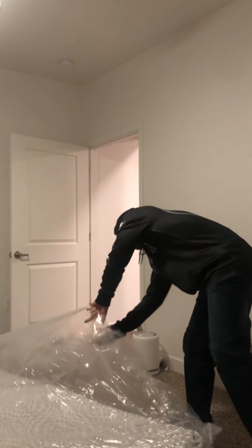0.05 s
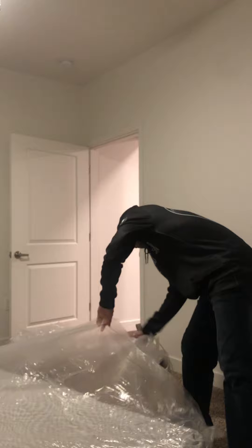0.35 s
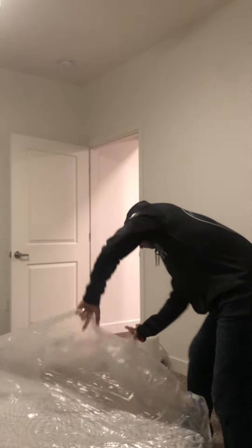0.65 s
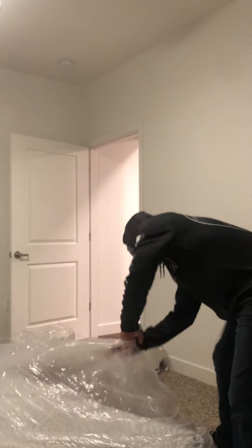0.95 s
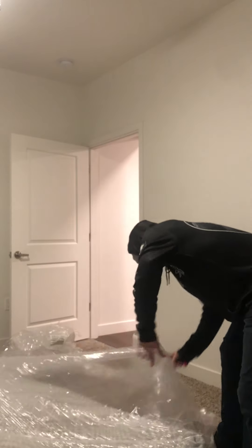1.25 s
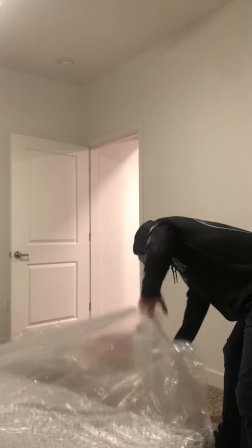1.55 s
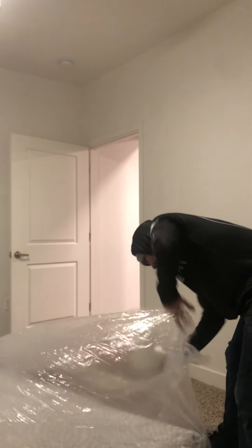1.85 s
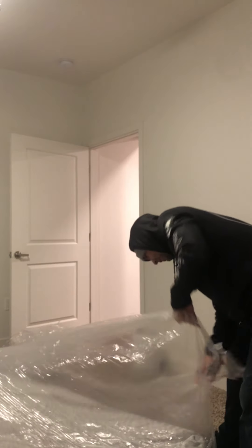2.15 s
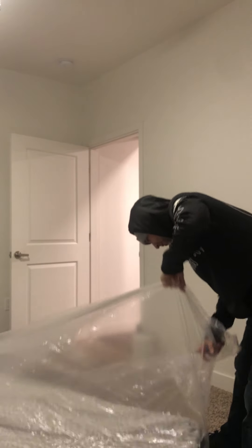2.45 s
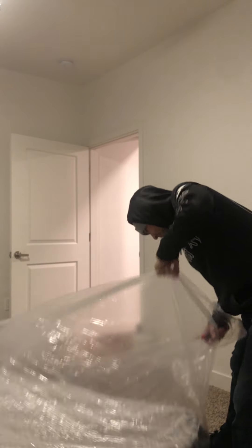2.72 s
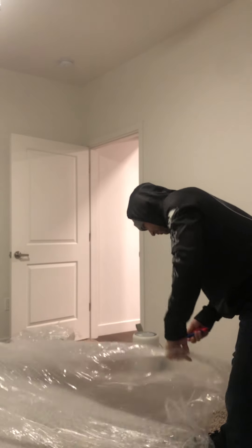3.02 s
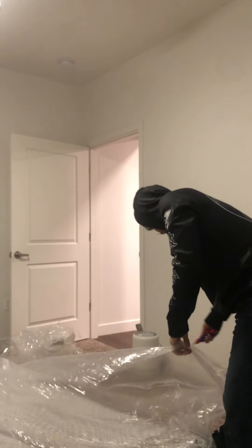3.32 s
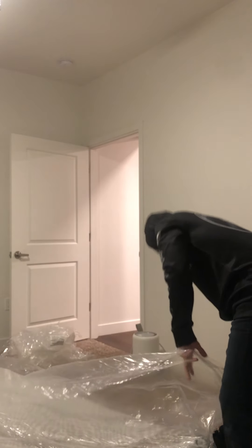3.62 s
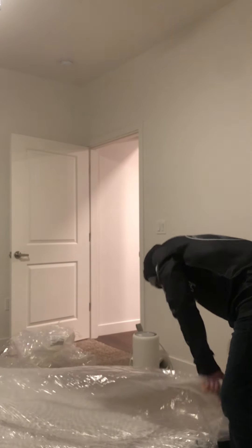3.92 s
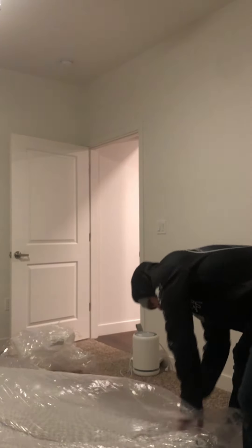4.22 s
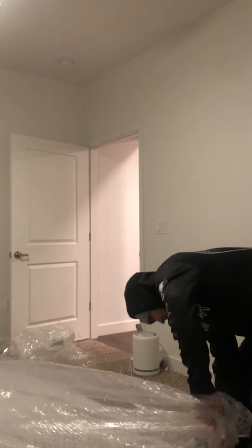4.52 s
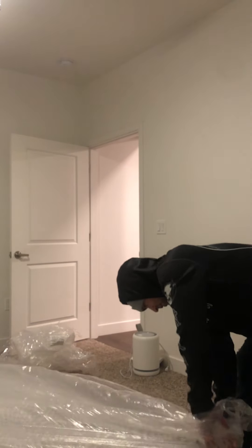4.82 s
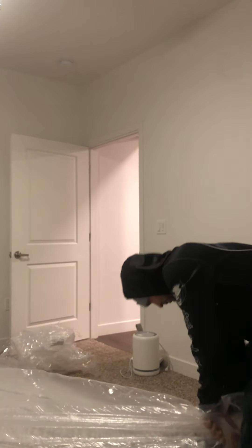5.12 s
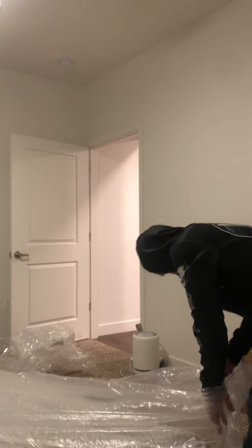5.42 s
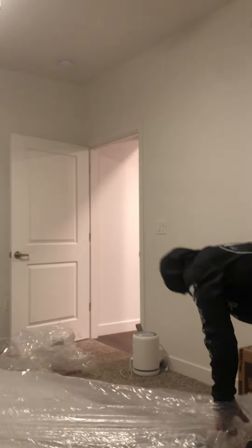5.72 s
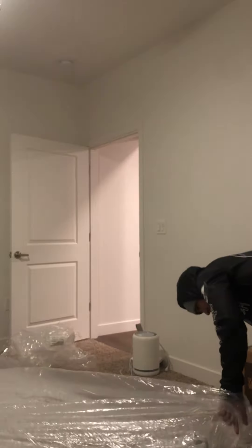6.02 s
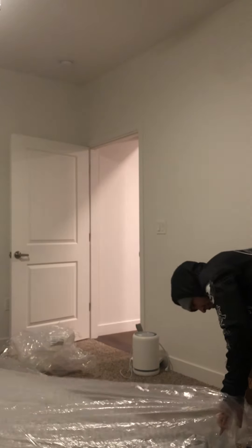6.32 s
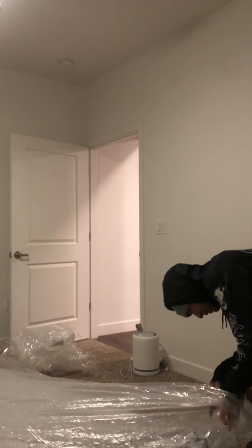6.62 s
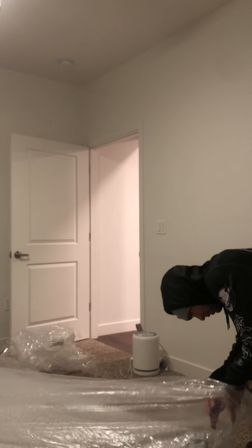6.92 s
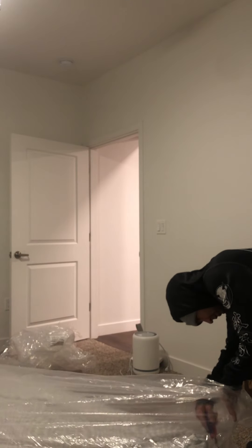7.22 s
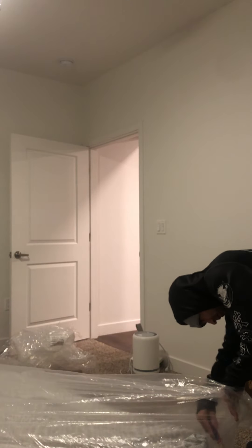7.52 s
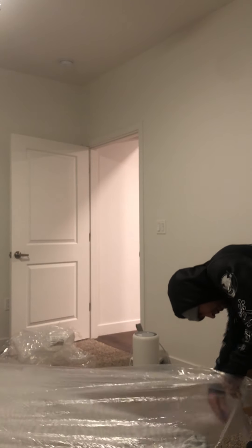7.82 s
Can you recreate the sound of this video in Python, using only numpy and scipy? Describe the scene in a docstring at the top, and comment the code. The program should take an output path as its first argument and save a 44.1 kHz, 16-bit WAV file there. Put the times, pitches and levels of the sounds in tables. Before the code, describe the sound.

Thick plastic wrap rustles and crinkles throughout as it is pulled off a mattress in a quiet, bare bedroom. For the first three seconds the tugs come quickly and are at their fullest, with a soft low billowing underneath and bright crease ticks, the sharpest just before 2 seconds. The rustle eases, and a short chirpy squeak comes at about 3.3 seconds, followed by a thin ping. At 3.9 seconds a cutter drops onto the carpeted floor with a loud, deep thump and bounces for about half a second, its steel blade ringing faintly. The crinkling resumes, with two light taps on hollow plastic around 4.8 and 5 seconds. A foot comes down dully at about 6 seconds. The sheet then slithers more quietly with scattered ticks, until the taut plastic snaps and rips several times between 7.4 and 7.9 seconds.

```python
"""Thick plastic wrap is cut and pulled off a mattress in a bare, carpeted bedroom.
The sheet slides, billows and buckles in countless tiny creases; single creases tick as they flip,
and taut film snaps and rips. Midway the film or the sliding cutter gives a short, chirpy squeak;
then the cutter drops to the floor with a thump and bounces, its steel blade ringing.
Hollow plastic is tapped twice, and later a foot comes down."""
import sys
import numpy as np
from scipy import signal
from scipy.fft import rfft, irfft, next_fast_len
from scipy.io import wavfile
from scipy.ndimage import uniform_filter1d

SR = 44100
rng = np.random.default_rng(int(sys.argv[2]) if len(sys.argv) > 2 else 0)


def to_wav(sig):
    """Store sig (one row per channel, or 1-D mono) as 16-bit WAV at the path in sys.argv[1].

    Samples outside -1..1 are clipped; the rate is SR.
    """
    pcm = np.clip(np.atleast_2d(sig), -1, 1) * 32767
    pcm = np.round(pcm).astype(np.int16)
    wavfile.write(sys.argv[1], SR, pcm.T)  # frames by channels


N = 355446
TIME = np.arange(N) / SR

# Tone colours of the quiet room, the slack sheet, the brighter taut film and crushed carpet.
# Each row: frequency in Hz, relative spectral level in dB.
ROOM_TONE_EQ = [(25, -14), (45, -20), (120, -27), (400, 5), (2000, 1), (8000, -14), (16000, -26)]
SHEET_EQ = [(21, -48), (35, -12), (140, 2.5), (360, 2.5), (420, 1.5), (478, 1.5), (758, -4), (1110, -4.5),
            (1680, -2), (2170, -5.5), (2530, -4), (7420, -8), (11200, -12), (14400, -17.5), (16000, -23)]
TAUT_FILM_EQ = [(100, -5), (300, 2), (600, 2.5), (1200, 6), (2500, 1.5), (6000, -0.5), (11000, -4),
                (14000, -5.5), (16000, -18)]
CARPET_EQ = [(35, -37), (80, -12), (170, 5.5), (330, 1), (560, 2), (900, -15), (2000, -32), (8000, -50)]
# The bedroom's reverb. Each row: frequency in Hz, t60 in seconds.
ROOM_DECAY = [(100, 0.79), (500, 0.25), (1500, 0.4), (4000, 0.28), (9000, 0.31), (15000, 0.2)]
# The sheet keeps slithering under the hands between pulls. Each row: time in seconds, level in dB.
SLITHER_LEVEL = [(0, -45), (0.3, -41.5), (1.59, -36.5), (2.02, -41.5), (2.54, -40), (2.77, -44.5),
                 (3.45, -48.5), (3.74, -51), (4.37, -39), (5.19, -47), (5.69, -43.5), (6.49, -50),
                 (6.79, -56), (7.17, -50), (7.28, -57), (7.45, -49.5), (7.72, -48), (8.0, -44.5)]
# Pulls and shoves of the sheet. Each row: start in seconds, length in seconds, rustle in dB,
# then sizzle of tight creases and flapping of large folds, both in dB relative to the rustle.
SHEET_PULLS = [(0.08, 0.11, -36.5, -7, -6.5), (0.306, 0.082, -34.5, -4, -2), (0.376, 0.13, -32, -5, -1.5),
               (0.656, 0.069, -42.5, 2, -4), (0.822, 0.18, -40, -4.5, -6.5), (1.031, 0.2, -37, -6.5, -7),
               (1.28, 0.11, -36.5, -2, -8), (1.591, 0.14, -32, -3.5, -3), (1.724, 0.21, -39, -5, -1.5),
               (2.03, 0.066, -43.5, 0.5, -7), (2.149, 0.18, -35, -3.5, -6),
               (2.555, 0.094, -37.5, -10, -4.5), (2.803, 0.27, -41, -7.5, -3.5),
               (3.266, 0.046, -47, -15, -7), (3.542, 0.06, -48, -13, -3.5), (3.805, 0.1, -46.5, -5, -4),
               (4.238, 0.24, -38.5, -4, -12), (4.434, 0.115, -35.5, -6.5, -5.5),
               (4.734, 0.095, -43, -7, -3), (4.96, 0.12, -44, -3, -2), (5.224, 0.072, -42.5, 1, -4),
               (5.324, 0.054, -35, -6, 0), (5.498, 0.075, -43.5, -0.5, 0.5),
               (5.746, 0.095, -45.5, -0.5, -12), (5.977, 0.045, -42, -5.5, -10),
               (6.138, 0.032, -40.5, 0.5, -18), (6.3, 0.16, -47, -9.5, -4.5),
               (6.545, 0.13, -50.5, -13, -4.5), (6.914, 0.1, -40.5, -3.5, -4.5),
               (7.314, 0.052, -40, -8, -3), (7.384, 0.033, -40.5, -6, 3.5), (7.766, 0.13, -38.5, -8, -4)]
# Film jerked taut, snapping or ripping.
# Each row: start in seconds, level in dB, t60 in seconds, boom send in dB.
FILM_SNAPS = [(0.353, -26.5, 0.078, -10), (3.7637, -38, .012, -12), (3.896, -35.5, 0.12, 0),
              (3.912, -33, 0.19, -13), (4.04, -29, 0.1, -1), (4.106, -32, 0.05, -14),
              (4.129, -35, 0.046, -14), (4.766, -35, 0.12, -15), (5.015, -33.5, 0.028, 8.5),
              (6.161, -33, 0.089, -0.5), (7.275, -38.5, 0.012, -12), (7.421, -28.5, 0.038, -10),
              (7.556, -21, 0.018, -0.5), (7.596, -26, 0.028, 6.5), (7.604, -31.5, 0.11, -5),
              (7.766, -32.5, 0.13, 0), (7.7798, -20, 0.036, -5), (7.797, -31, 0.23, -4.5)]
# Loud single creases flipping over. Each row: start in seconds, level in dB.
CREASE_TICKS = [(0.653, -19), (0.986, -16), (1.828, -11), (1.906, -13), (3.315, -22.5), (3.49, -28),
                (3.587, -23.5), (3.652, -28), (3.764, -25), (3.858, -33), (4.703, -19), (5.013, -21),
                (5.029, -21), (5.116, -24), (5.1836, -21), (6.302, -31), (6.478, -28), (6.827, -34),
                (6.877, -31), (7.001, -19), (7.201, -25.5), (7.275, -41), (7.32, -37), (7.364, -20),
                (7.421, -23), (7.5551, -16), (7.5966, -14)]
# Cutter and foot hitting the floor.
# Each row: start in seconds, level in dB, pitch of the struck spot in Hz, contact time in seconds.
FLOOR_HITS = [(3.895, -5.5, 171, 0.0032), (3.913, 5.5, 172, 0.0016), (4.021, -5.5, 178, 0.0031),
              (4.038, -0.5, 187, 0.0031), (4.107, -10.5, 198, 0.0042), (4.182, -18, 190, 0.003),
              (4.243, -11, 188, 0.0014), (4.301, -11.5, 199, 0.0028), (5.979, -21.5, 170, 0.0015),
              (5.994, -11, 174, 0.00087), (6.05, -21, 163, 0.0022), (6.108, -21.5, 212, 0.0017),
              (6.153, -13.5, 192, 0.0038)]
# Cues for the squeak, the cutter's slider and blade, and hollow plastic tapped in the hand.
# Each row: start in seconds, level in dB.
SQUEAK_HITS = [(3.326, -49), (3.338, -42.5)]
SLIDER_HITS = [(3.586, -37)]
BLADE_HITS = [(3.915, -31), (4.043, -31.5), (4.105, -38.5)]
HOLLOW_HITS = [(4.825, -38.5), (5.014, -35)]
# The resonances of those four sounds, and the long low modes of floor and room.
# Each row: frequency in Hz, relative level in dB, t60 in seconds.
SQUEAK_MODES = [(2410, 1, 0.069), (2550, -3, .13), (3420, -4, 0.097)]
SLIDER_MODES = [(3900, -9, .025), (5000, 1, 0.037)]
BLADE_MODES = [(3280, -2, 0.09), (4210, 1, 0.044), (5000, -2, 0.053), (6060, -15, .12), (8403, -8, .14),
               (8936, -5, .10), (10100, -2, .08), (11000, -3.5, 0.17), (11130, -10, 0.07), (12350, -6, .09),
               (13200, -13, .10), (14200, -13, .07)]
HOLLOW_MODES = [(800, -1, 0.042), (863, 0, 0.047), (1230, -3.5, .08)]
FLOOR_MODES = [(95, -21, 0.19), (144.5, -24, 0.47), (187.4, -23.5, 0.39), (248, -35, 0.52),
               (323.5, -12.5, 0.15), (391, -27.5, 0.16), (530, -19, 0.083), (625, -18, 0.11)]


def from_db(db):
    """Decibels to gain."""
    return 10 ** (np.asarray(db) / 20)


def unit_rms(x):
    """Scale to rms 1."""
    return x / np.sqrt(np.mean(x ** 2) + 1e-20)


def at_hz(points, hz):
    """Read a curve on a log-frequency axis."""
    freqs, values = np.transpose(points)
    return np.interp(np.log(np.maximum(hz, 1)), np.log(freqs), values)


def band(x, low_hz, high_hz, order=2):
    """Band-pass, its edges held safely below half the sample rate."""
    edges = np.clip([low_hz, high_hz], 10, .47 * SR)
    return signal.sosfilt(signal.butter(order, edges, "band", fs=SR, output="sos"), x + 1e-18)


def coloured(x, eq):
    """Shape a steady texture with an EQ curve; rms 1."""
    size = next_fast_len(N)
    hz = np.arange(size // 2 + 1) * SR / size
    return unit_rms(irfft(rfft(x, size) * from_db(at_hz(eq, hz)), size)[:N])


def drift(rate_hz):
    """A random modulator gliding from value to value; rms 1."""
    knots = rng.standard_normal(N // 20)
    return unit_rms(np.interp(TIME * rate_hz, np.arange(len(knots)), knots))


def add(out, start_s, sound):
    """Mix a sound in at its start time."""
    start = round(start_s * SR)
    out[start:start + len(sound)] += sound[:N - start]


def decay(t60):
    """One second of envelope that falls 60 dB in t60 seconds."""
    return from_db(-60 * TIME[:SR] / max(t60, 1e-4))


def ringing(modes):
    """One second of a struck body's modes."""
    return sum(from_db(db) * decay(t60) * np.sin(2 * np.pi * hz * TIME[:SR]) for hz, db, t60 in modes)


def struck(hits, modes):
    """Ring a set of modes at each hit."""
    out = np.zeros(N)
    for start, db in hits:
        add(out, start, from_db(db) * ringing(modes))
    return out


def bedroom(x, wet_db, build_s=0.0056):
    """Direct sound plus dense wall reflections that linger longest in the bass."""
    edges = np.geomspace(50, 18000, 10)
    tail = sum(band(rng.standard_normal(SR), low, high) * decay(at_hz(ROOM_DECAY, np.sqrt(low * high)))
               for low, high in zip(edges, edges[1:]))
    tail *= np.minimum(TIME[:SR] / build_s, 1)
    return x + from_db(wet_db) * signal.fftconvolve(x, unit_rms(tail) / np.sqrt(SR))[:N]


def wash(x, t60):
    """Reflections of a moving source never repeat: noise that follows its dying energy."""
    energy = np.abs(signal.fftconvolve(x ** 2, decay(t60 / 2))[:N])
    return rng.standard_normal(N) * np.sqrt(unit_rms(energy))


def room_tone(level_db=-62):
    """The faint, steady hush of the room."""
    return from_db(level_db) * coloured(rng.standard_normal(N), ROOM_TONE_EQ)


def handling(attack_s=0.061, settle_db_per_s=127.5, sizzle_follow=0.54):
    """Fader curves in dB for rustle, sizzle and folds: pulls add their power to the slithering."""
    slither_db = np.interp(TIME, *np.transpose(SLITHER_LEVEL))
    # sizzle and folds sit under the slither; the louder it gets, the brighter
    sizzle_db = slither_db - 11 + sizzle_follow * (slither_db - slither_db.mean())
    folds_db = slither_db - 5
    power = from_db([slither_db, sizzle_db, folds_db]) ** 2
    for start, length, db, tight_db, flap_db in SHEET_PULLS:
        # a pull takes up the slack and holds; let go, the sheet settles
        take_up = np.minimum(TIME[:SR] / attack_s, 1)
        settle = from_db(-settle_db_per_s * np.maximum(TIME[:SR] - length, 0))
        for layer, relative_db in zip(power, (0, tight_db, flap_db)):
            add(layer, start, (from_db(db + relative_db) * take_up * settle) ** 2)
    return 10 * np.log10(power)


def creases(per_s, spread_db, cycles):
    """Random bucklings, mostly small; each facet rings a few cycles, and stiff small ones vary most."""
    buckles = (rng.random(N) < per_s / SR) * rng.choice([-1, 1], N)
    strength = np.minimum(rng.exponential(1, N), 3.6)
    facet_hz = np.geomspace(1500, 14000, 14)
    facet_of = rng.integers(0, len(facet_hz), N)
    out = np.zeros(N)
    for facet, hz in enumerate(facet_hz):
        accent = from_db(spread_db * strength * np.sqrt(hz / facet_hz[-1]))
        clicks = buckles * (facet_of == facet) * accent
        radius = from_db(-60 * hz / (cycles * SR))
        resonator = [1, -2 * radius * np.cos(2 * np.pi * hz / SR), radius ** 2]
        out += np.sqrt(hz) * unit_rms(signal.lfilter([1, 0, -1], resonator, clicks + 1e-18))
    return unit_rms(out)


def rustle(level_db, sizzle_db, base_per_s=1500, clump_db=5.0, wash_db=2.5, slide_db=1.5):
    """Film slides on film and buckles in clumps; harder handling makes creases denser and louder."""
    density = base_per_s * from_db(.8 * (level_db - np.mean(level_db)) + clump_db * drift(60))
    grains = creases(density, spread_db=3.5, cycles=4.2)
    # even out the grains over 0.1 s, so the fader curves set the loudness
    grains = unit_rms(grains / np.sqrt(uniform_filter1d(density, size=SR // 10)))
    reflections = from_db(wash_db) * wash(grains, t60=1.0)
    slide = from_db(slide_db) * rng.standard_normal(N)
    film = coloured(grains + reflections + slide, SHEET_EQ)
    film *= from_db(0.26 * drift(45))  # slight flutter
    # one crossover splits the dull crinkle from the sizzle of tight creases
    sizzle = signal.sosfiltfilt(signal.butter(2, 7500, "high", fs=SR, output="sos"), film)
    crinkle = film - sizzle
    crinkle_gain = from_db(level_db + 0.22) / np.std(band(film, 1000, 6000))
    sizzle_gain = from_db(sizzle_db + 0.2) / np.std(band(film, 8000, 16000))
    return band(crinkle * crinkle_gain + sizzle * sizzle_gain, 667, 15300, order=3)


def billow(folds_db, trim_db=-0.2, flap_db=1.2):
    """Broad folds flap and push air: the low rumble under the crinkle."""
    air = unit_rms(band(coloured(rng.standard_normal(N), SHEET_EQ), 37, 853, order=3))
    return air * from_db(folds_db + trim_db + flap_db * drift(35))


def snaps(boom_trim_db=-6.5, min_boom_t60=0.033):
    """Taut film lets go in an avalanche of creases, and the whole sheet booms like a slack drum."""
    crack_env, boom_env = np.zeros(N), np.zeros(N)
    for start, db, t60, send_db in FILM_SNAPS:
        add(crack_env, start, from_db(db) * decay(t60))
        add(boom_env, start, from_db(db + send_db + boom_trim_db) * decay(max(t60, min_boom_t60)))
    tearing = creases(per_s=9000, spread_db=4.0, cycles=3.0) + rng.standard_normal(N)
    crack = band(crack_env * coloured(tearing, TAUT_FILM_EQ), 140, .47 * SR)
    boom = boom_env * unit_rms(band(rng.standard_normal(N), 155, 350, order=3))
    return bedroom(band(crack + boom, 61, 20000), wet_db=-2.0)


def ticks(sizzle_db, trim_db=-4.0, shiver_db=-4.0, strays_per_s=7, stray_spread_db=2.5):
    """A stiff crease flips: one very short bright crack, then the film around it shivers."""
    out = np.zeros(N)
    # stray ticks fall at random between the cued ones and ride above the sizzle
    stray_db = sizzle_db + 20 + stray_spread_db * rng.standard_normal(N)
    is_stray = rng.random(N) < strays_per_s / SR
    for start, db in [*CREASE_TICKS, *zip(TIME[is_stray], stray_db[is_stray])]:
        crack = decay(t60=0.0012) * np.cos(2 * np.pi * rng.uniform(7800, 11000) * TIME[:SR])
        shiver = from_db(shiver_db) * decay(t60=0.008) * rng.choice([-1, 1], SR)
        add(out, start, from_db(db + trim_db) * (crack + shiver))
    return bedroom(band(out, 3800, 12500), wet_db=-5.5)


def squeak_and_ping():
    """A short, chirpy squeak of the film or the sliding cutter, then a thin ping from its slider."""
    squeak = struck(SQUEAK_HITS, SQUEAK_MODES)
    ping = struck(SLIDER_HITS, SLIDER_MODES)
    return bedroom(squeak + ping, wet_db=-11.0)


def floor_thumps(spot_t60=0.089, swell_s=0.15, scuff_db=-17, scuff_loss_db_per_s=4500):
    """Blows scuff the carpet and set the floor booming; a longer contact is duller and scuffs less."""
    boom, scuff_env = np.zeros(N), np.zeros(N)
    floor = ringing(FLOOR_MODES)
    swell = 1 - decay(swell_s)  # the boom takes a few cycles to spread
    for start, db, spot_hz, contact_s in FLOOR_HITS:
        push = np.sin(np.pi * np.minimum(TIME[:SR] / max(contact_s, 1e-3), 1))  # at least 1 ms long
        response = (ringing([(spot_hz, 0, spot_t60)]) + floor) * swell
        add(boom, start - contact_s / 2, from_db(db) * signal.fftconvolve(push / push.sum(), response))
        scuff_gain = from_db(db + scuff_db - scuff_loss_db_per_s * contact_s)
        add(scuff_env, start, scuff_gain * decay(t60=0.12))
    scuff = scuff_env * coloured(rng.standard_normal(N), CARPET_EQ)
    return band(boom + bedroom(scuff, wet_db=-1.5), 84, 8000, order=4)


def blade_ring(rattle_depth=0.96):
    """The loose steel blade rings and rattles as the cutter bounces."""
    rattle = (1 + rattle_depth * drift(700)) / np.sqrt(1 + rattle_depth ** 2)
    return bedroom(struck(BLADE_HITS, BLADE_MODES) * rattle, wet_db=-0.5)


def hollow_taps():
    """Hard hollow plastic is knocked lightly and rings briefly."""
    return bedroom(struck(HOLLOW_HITS, HOLLOW_MODES), wet_db=-7.0)


def scene():
    """Mono mix of the sheet, the spot effects and the ticks over a bed of room tone."""
    hush = room_tone()
    rustle_db, sizzle_db, folds_db = handling()
    sheet = rustle(rustle_db, sizzle_db) + billow(folds_db) + snaps()
    spot_effects = floor_thumps() + blade_ring() + squeak_and_ping() + hollow_taps()
    return (sheet + spot_effects + ticks(sizzle_db) + hush)[None]


def record(dry):
    """A steep high cut on the whole mix."""
    cutoff_hz = 15900
    return signal.sosfilt(signal.ellip(12, .1, 70, cutoff_hz, fs=SR, output="sos"), dry)


dry = scene()
out = record(dry)
to_wav(out)
```